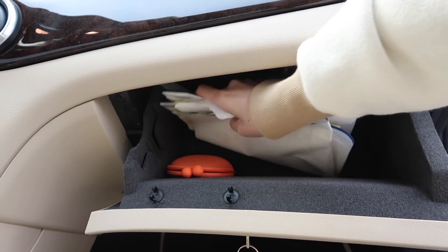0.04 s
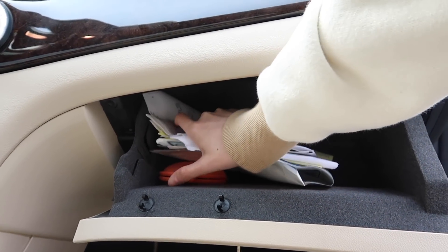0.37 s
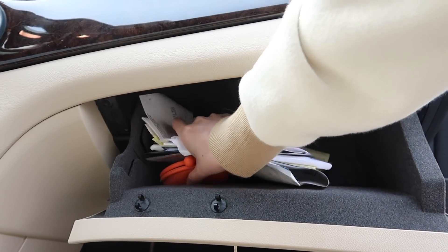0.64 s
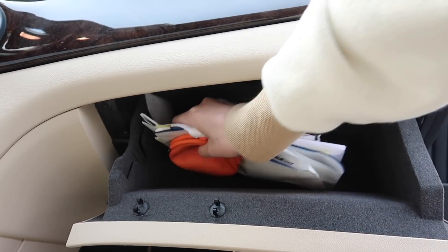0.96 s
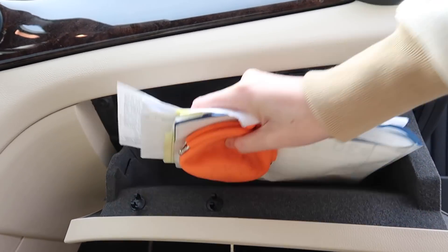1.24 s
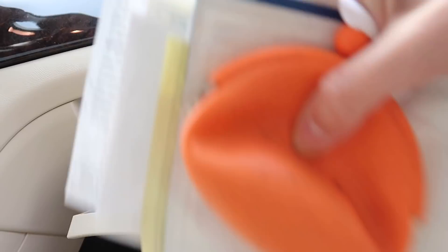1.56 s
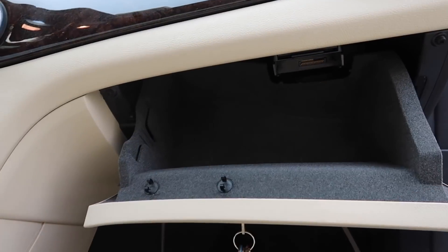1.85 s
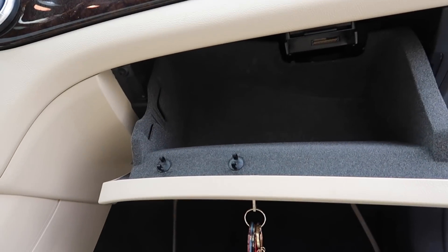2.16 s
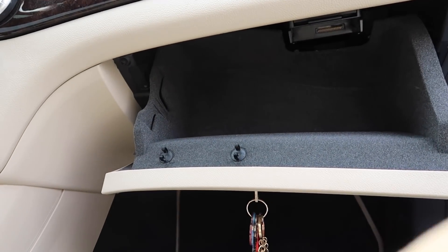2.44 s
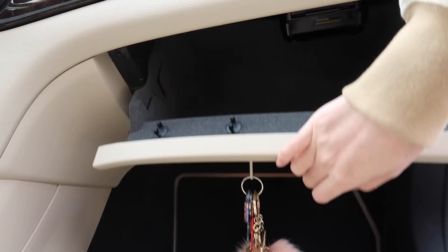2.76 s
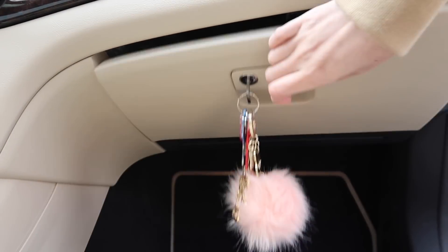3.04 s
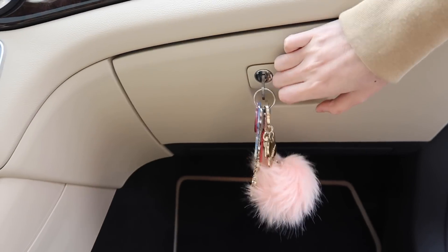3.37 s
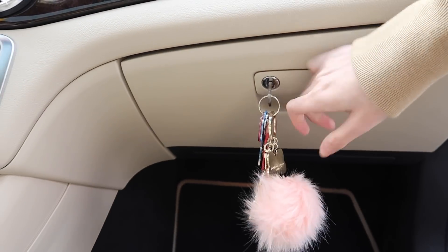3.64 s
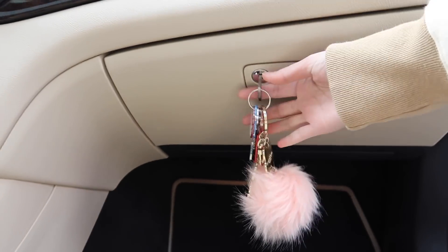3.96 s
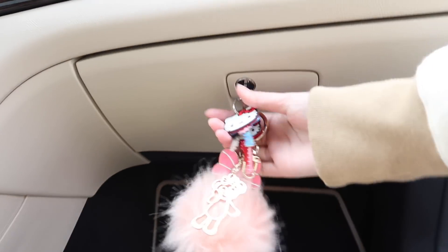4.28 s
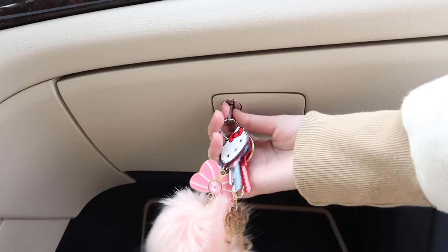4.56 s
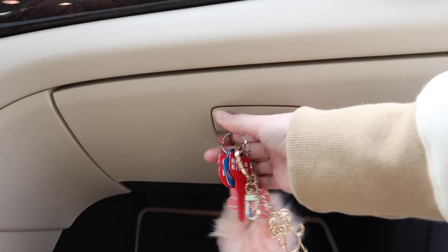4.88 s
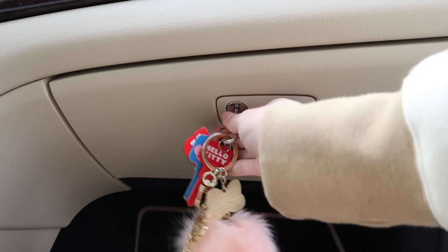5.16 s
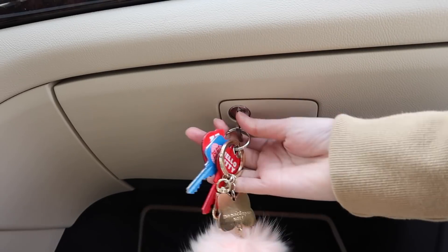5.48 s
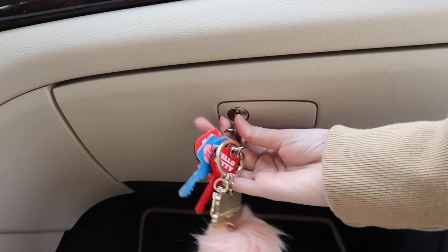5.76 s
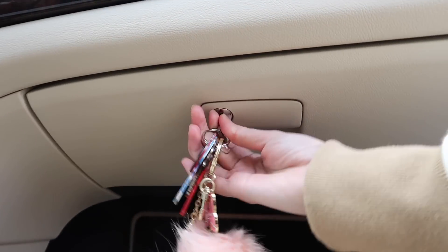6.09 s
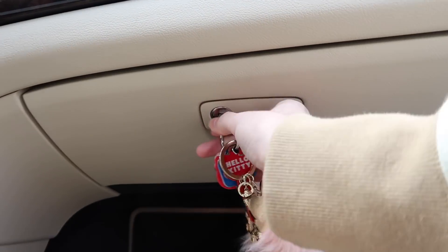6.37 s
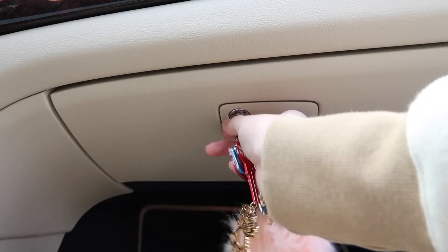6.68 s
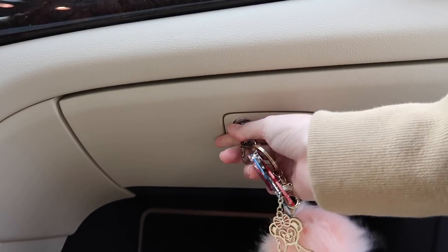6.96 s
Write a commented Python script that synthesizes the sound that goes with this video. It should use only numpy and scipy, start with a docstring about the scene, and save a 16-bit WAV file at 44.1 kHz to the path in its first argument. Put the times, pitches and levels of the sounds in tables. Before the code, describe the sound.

Inside a small padded car cabin, over a steady low hum, a bundle of papers is dragged from the glovebox, rubbing, crackling and snapping, with dull knocks on plastic. The lid shuts with a loud clack and thump. Keys and charms hanging from the lock clink, then jingle in the fingers while the key clicks and grates in its slot. A knitted sleeve brushes close to the microphone.

```python
"""Inside a small padded car cabin, over a low rumble, a hand drags papers out of the glovebox.
The sheets rub, crackle and snap as they buckle; knocks ring the plastic, and the lid shuts with a clack.
The keys and charms hanging from the lock swing and clink, then jingle in the fingers, which cut their
ringing short, while the key clicks and grates in its slot. A knitted sleeve brushes about close by."""
import sys
import numpy as np
from scipy import signal
from scipy.fft import rfft, irfft
from scipy.io import wavfile
from scipy.ndimage import uniform_filter1d

SR = 44100
rng = np.random.default_rng(int(sys.argv[2]) if len(sys.argv) > 2 else 0)


def store_pcm(level_fs):
    """Save levels as 16-bit WAV."""
    pcm = np.round(np.clip(level_fs, -1, 1) * 32767).astype(np.int16)
    wavfile.write(sys.argv[1], SR, np.atleast_2d(pcm).T)


N = 309876
TIME = np.arange(N) / SR
AGE = np.arange(SR // 6) / SR  # seconds since a hit

# A TONE table says how strong a sound is from bass to treble. A decay is the time to fade by 60 dB.
# Steady hum of the cabin: pitch_hz, level_db
DRONE_TONE = [(15, -13), (30, -13), (38, 1), (44, 5.5), (52, -5), (65, -20), (140, -16.5), (260, -23),
              (500, -40), (1000, -31.5), (2000, -40), (4000, -57), (9000, -61), (15000, -73)]
# Rumble of handling: pitch_hz, level_db
RUMBLE_TONE = [(40, -26), (65, 4.5), (140, 0.5), (210, -3.5), (280, -9.5), (450, -13.5), (800, -24.5),
               (1500, -59)]
# The rumble drops while the hand rests on the shut lid: time_s, level_db
RUMBLE_LEVELS = [(0, -35), (.8, -34), (2, -35), (3.2, -33), (3.48, -36.5), (3.68, -52.5), (4.15, -41.5),
                 (4.6, -39), (6.45, -34.5), (7.03, -34)]

# Pulls that slide paper on paper and felt: start_s, length_s, rise_s, rub_db, hiss_db
PAPER_PULLS = [(0, 0.19, 0.002, -41, -49), (0.16, 0.13, 0.027, -35.5, -41), (0.253, 0.09, 0.0069, -32, -39),
               (0.329, 0.082, 0.017, -36, -48.5), (0.438, 0.43, 0.078, -38.5, -49),
               (0.895, 0.25, .02, -29.5, -42.5), (0.994, 0.091, 0.042, -30, -36),
               (1.07, 0.11, .02, -39.5, -45), (1.188, 0.071, .02, -48, -51.5),
               (1.325, 0.15, 0.017, -40, -47), (1.407, 0.13, 0.014, -46, -40),
               (1.498, 0.016, 0.0081, -34, -33.5), (1.606, 0.28, 0.022, -48.5, -66),
               (1.808, 0.2, 0.036, -42, -57), (1.96, 0.14, 0.021, -41, -44.5),
               (2.061, 0.084, 0.071, -30.5, -41), (2.17, 0.053, 0.016, -35, -47),
               (2.26, 0.13, .02, -38.5, -51.5), (2.424, 0.046, .008, -39.5, -52.5),
               (2.452, 0.28, 0.18, -42, -56.5), (2.722, 0.38, .02, -73, -88)]
# Sheets rubbing: pitch_hz, level_db
RUB_TONE = [(200, -3), (380, 4.5), (520, 12.5), (700, 6.5), (1100, 7), (1280, 2), (1520, 7.5), (2100, 1.5),
            (3000, -1), (4200, -13), (6000, -17.5), (12000, -63)]
# Paper edges hissing: pitch_hz, level_db
HISS_TONE = [(2000, -19), (3500, 5), (5000, -0.5), (7000, -2), (10000, -7), (13000, -8.5), (15500, -28)]
# A sheet buckles: time_s, level_db, crispness_db, pitch_hz
PAPER_SNAPS = [(.0005, -20, 17.5, 1500), (.027, -35, 24, 3200), (.149, -36, -6, 2200),
               (0.163, -30, -3, 1970), (0.1763, -22.5, 11, 1900), (.249, -14, 14.5, 1130),
               (0.286, -30, 5, 1700), (0.323, -30, 5, 2790), (0.307, -21, 4, 1470), (0.456, -28, 2, 1110),
               (0.468, -25.5, 6, 1510), (0.503, -25.5, 9, 1700), (.549, -30.5, 14, 2670),
               (0.681, -32.5, 2, 2500), (0.719, -39, 10, 1700), (0.796, -23.5, 0.5, 2620),
               (0.82, -27, 1, 2980), (0.849, -27.5, -7, 1550), (0.8771, -21.5, 0, 2700),
               (0.8936, -19.5, 7, 2630), (0.9015, -18, 4, 3370), (.924, -25, -2, 2600),
               (.951, -25, 5, 2920), (0.969, -24.5, 2, 2000), (1.024, -22.5, 6, 2300),
               (1.042, -21.5, 11, 1190), (1.065, -28, 3, 2500), (1.076, -22.5, 9, 3060),
               (1.139, -31, 15, 3600), (1.163, -28.5, 3, 1890), (1.267, -34, -19, 1490),
               (1.339, -43, -9, 3000), (1.455, -37, 2, 1860), (1.465, -20.5, -1, 2530),
               (1.507, -15.5, 0, 1590), (1.514, -13, -1, 1480), (1.539, -19, 7, 1470),
               (1.545, -19, -12, 1290), (1.5511, -16, -5, 1480), (1.5774, -17.5, 6, 3470),
               (1.9796, -48, 0, 2400), (2.065, -26, -17, 1550), (2.1043, -30, 8, 1100),
               (2.114, -24, -4, 2300), (2.138, -22, 3.5, 1390), (2.147, -26, -3, 1700),
               (2.158, -30, -3, 1600), (2.2724, -27.5, -8, 1450), (2.3204, -27.5, -3, 1060),
               (2.3412, -13, 5, 1570), (2.372, -34, 3, 2400), (2.4351, -28, -5, 1930),
               (2.644, -33, -12, 2260), (2.674, -38, -7, 1500)]
# The snap of a sheet: pitch_hz, level_db
SNAP_TONE = [(120, -3), (300, 9), (700, 5), (1600, 6.5), (3200, 1), (5000, -6.5), (8000, -22),
             (13000, -31.5), (16000, -80)]
# The buckling patch favours its own pitch and a band higher up: pitch_ratio, level_db
FOLD_TONE = [(0.9, -7), (1, 0), (1.45, -7), (1.53, -8), (2.6, -3), (2.4, -6)]

# Dull knocks on the box and its lid: time_s, level_db, pitch_hz, relative_flex_db
BOX_KNOCKS = [(0.104, -31.5, 520, -14), (0.474, -28, 520, -6), (.547, -21, 499, -22), (1.156, -7, 478, -29),
              (1.266, -25.5, 465, -14), (1.2647, -26.5, 1040, -15), (1.54, -18, 467, 1.5),
              (2.137, -37, 396, 14.5), (2.19, -24, 327, -2), (2.71, -27.5, 473, 1),
              (3.233, -16.5, 543, -4.5), (3.491, -25.5, 530, -6.5), (4.314, -35, 575, -5.5),
              (4.545, -24, 390, -16), (4.572, -36, 514, -2), (4.594, -25, 543, -4),
              (4.616, -25.5, 463, -11), (4.63, -28.5, 562, 2), (4.983, -20, 421, -5),
              (5.093, -23.5, 465, -13), (5.153, -38, 520, -5), (5.648, -25, 492, -6),
              (5.916, -15, 502, -11), (6.322, -30, 476, -1), (6.528, -22.5, 388, -14),
              (6.553, -21.5, 453, 0), (6.686, -23.5, 413, 5), (6.721, -25, 428, -3)]
# Modes (the notes a thing rings with) of the plastic panel: pitch_ratio, level_db
PANEL_MODES = [(0.298, -19), (.72, -6), (0.88, -6), (1, 7.5), (1.1, 3), (1.42, -8), (2.2, -10)]
# The thud in each knock: pitch_hz, level_db
THUD_TONE = [(120, 2), (300, -17.5), (500, 4.5), (700, -10), (1150, -20), (1700, -16), (5000, -41.5)]

# Sheets squeal on the rim of the box: time_s, level_db
SQUEAK_LEVELS = [(1.6, -71), (1.64, -49.5), (1.72, -39), (1.76, -59), (1.82, -53)]
# The narrow band of that squeal: pitch_hz, level_db
SQUEAK_TONE = [(1000, -47.5), (1300, -2.5), (1400, -8.5), (1480, -7), (1800, -60)]
# The sleeve moves as the arm shuts the lid, lets go and works the key: time_s, level_db
SLEEVE_LEVELS = [(2.7, -37.5), (3.08, -40.5), (3.15, -29), (3.28, -34), (3.58, -53.5), (3.76, -50.5),
                 (3.85, -50), (4.2, -43), (4.4, -40.5), (4.62, -35), (4.8, -39), (5.2, -36), (5.8, -39.5),
                 (6.3, -37), (7.03, -39)]
# Knitted cloth brushing: pitch_hz, level_db
CLOTH_TONE = [(250, 14), (520, 6.5), (800, 0.5), (1500, -2.5), (2200, -8), (3500, -16.5), (7000, -26),
              (14000, -42), (15700, -62)]

# The lid meets its catch, rattles and latches: time_s, clack_db, thump_db, boom_db, rise_s, decay_s
LID_HITS = [(3.1577, -13, -18, -40, 0.0038, 0.055), (3.165, -20.5, -11.5, -26, 0.0026, 0.045),
            (3.175, -26.5, -12, -25, .003, 0.035), (3.233, -26.5, -19, -39, 0.0034, 0.08),
            (3.429, -23, -40, -40, 0.0012, 0.03), (3.4332, -2.5, -12, -11, 0.0006, 0.042),
            (5.913, -30, -21, -20, 0.00077, 0.067)]
# The hard clack of the lid: pitch_hz, level_db
CLACK_TONE = [(120, -13), (220, -11.5), (580, 0), (900, -7), (1150, -8), (1500, 2), (1900, -7.5),
              (2400, -8.5), (3100, -12.5), (3800, -17), (4900, -15), (8500, -24.5), (15500, -43)]
# Low notes of the lid: pitch_hz, level_db, decay_s
LID_LOW_MODES = [(160, -1, 0.11), (192, 0, 0.1), (262, -6, .06), (345, 2, 0.06), (480, -3, .045),
                 (590, -6, 0.06)]
# High notes of the lid: pitch_hz, level_db, decay_s
LID_HIGH_MODES = [(660, -4, .028), (917, -3, .025), (1128, 3.5, .03), (1490, 1.5, .026), (1735, -2, .024),
                  (3084, 3, .024), (3661, -1, .022), (4450, -9, .02)]

# Trinkets (keys, charm, tag) collide: time_s, contact_db, ring_db, struck_name
TRINKET_CLINKS = [(3.1605, -20.5, -56, "keys"), (3.2, -53, -40, "keys"), (3.2348, -44, -33.5, "charm"),
                  (3.284, -57, -40.5, "keys"), (3.386, -70, -58, "charm"), (3.492, -41, -43, "keys"),
                  (3.5198, -46, -45, "charm"), (3.564, -65, -56, "tag"), (3.902, -59, -75, "keys"),
                  (3.957, -55, -73, "keys"), (4.041, -52, -65, "keys"), (4.0733, -46, -56.5, "keys"),
                  (4.144, -53, -75, "keys"), (4.251, -38, -35.5, "charm"), (4.352, -47, -55, "keys"),
                  (4.4458, -49, -45.5, "charm"), (4.493, -41, -47, "tag"), (4.527, -44, -45, "keys"),
                  (4.553, -35, -35.5, "charm"), (4.577, -34, -39, "keys"), (4.637, -36, -49, "keys"),
                  (4.658, -40, -55, "keys"), (4.684, -41.5, -45.5, "tag"), (4.7377, -40.5, -51, "tag"),
                  (4.796, -45, -60, "keys"), (4.814, -45.5, -62, "keys"), (4.865, -52, -58, "tag"),
                  (4.9594, -41, -55, "tag"), (4.979, -43, -63, "charm"), (5.0012, -55, -34.5, "tag"),
                  (5.043, -42, -48, "charm"), (5.116, -43, -43, "keys"), (5.138, -48, -49, "charm"),
                  (5.152, -35, -34, "charm"), (5.196, -35, -41, "tag"), (5.215, -54, -44, "keys"),
                  (5.237, -40, -50, "charm"), (5.2895, -42, -46.5, "keys"), (5.313, -35.5, -27, "tag"),
                  (5.326, -37, -31, "tag"), (5.434, -51, -61, "charm"), (5.463, -41, -50, "charm"),
                  (5.487, -40, -57, "charm"), (5.5197, -39, -44, "tag"), (5.53, -36, -42, "charm"),
                  (5.544, -40, -59, "tag"), (5.6197, -40, -51, "charm"), (5.68, -38.5, -50, "tag"),
                  (5.774, -59, -59, "charm"), (5.833, -52, -58, "tag"), (5.886, -54, -53, "tag"),
                  (5.914, -45, -48, "tag"), (5.931, -33.5, -37, "charm"), (5.941, -47, -43, "keys"),
                  (5.97, -40, -42, "keys"), (6.0327, -34, -34.5, "charm"), (6.262, -51, -56, "charm"),
                  (6.301, -31.5, -41.5, "charm"), (6.331, -36, -55, "keys"), (6.356, -36, -61, "keys"),
                  (6.476, -37, -41, "tag"), (6.5053, -26, -37, "keys"), (6.617, -36.5, -41, "tag"),
                  (6.6547, -29, -46, "charm"), (6.6747, -26.5, -39, "tag"), (6.721, -39, -52, "keys"),
                  (6.735, -30.5, -38, "tag"), (6.787, -41, -49, "tag"), (6.808, -41, -59, "charm"),
                  (6.906, -47.5, -53, "tag")]
# Notes of the keys: pitch_hz, level_db, decay_s
KEY_MODES = [(3250, -10, .05), (7355, -2, .16), (7410, -1, .14), (7630, -5, .1), (7810, -7, .07),
             (8597, -7, .06)]
# Notes of the wire charm: pitch_hz, level_db, decay_s
CHARM_MODES = [(11550, -7, .03), (11965, -2, .035), (12260, -3, .035), (12420, 0, .055), (12650, -5, .03)]
# Notes of the flat tag: pitch_hz, level_db, decay_s
TAG_MODES = [(10025, -4, .12), (10114, 0, .16), (10298, -11, .05), (13695, -13, .09)]
# Small chain links ticking and scraping: pitch_hz, level_db
LINK_TONE = [(900, 5), (1900, 10), (2400, 2.5), (3200, 7), (4200, 3), (5200, 5), (6000, 1.5), (7500, 4.5),
             (9500, 1), (11000, -10), (12300, 1.5), (13700, -14.5), (14600, -34), (16000, -51.5)]
# The bunch is shaken and its chain rattles: start_s, length_s, level_db
CHAIN_SHAKES = [(3.167, 0.12, -45), (3.428, 0.071, -46.5), (4.027, 0.055, -67), (4.206, 0.057, -49.5),
                (4.327, 0.14, -79), (4.429, 0.13, -54), (4.515, 0.078, -42.5), (4.657, 0.14, -65),
                (4.94, 0.15, -63), (5.186, 0.021, -49), (5.313, 0.051, -53), (5.45, 0.033, -50.5),
                (5.498, 0.03, -56), (5.61, 0.58, -63.5), (5.908, 0.073, -52), (6.033, 0.3, -67),
                (6.286, 0.069, -46), (6.455, 0.18, -52), (6.61, 0.16, -47.5), (6.768, 0.032, -56)]
# The chain drums on the lid through the key: pitch_hz, level_db
DRUM_TONE = [(150, -8.5), (340, -22.5), (520, 14), (640, 0.5), (850, -16.5), (2000, -13.5), (5000, -39.5)]

# Fingers slide over plastic: start_s, length_s, rise_s, level_db
FINGER_SLIDES = [(3.709, 0.054, .05, -54.5), (4.296, 0.19, 0.02, -52.5)]
# The whisper of skin: pitch_hz, level_db
SKIN_TONE = [(1000, -11), (2500, 1.5), (3800, -1), (6000, -10), (10000, -17), (13000, -20), (15500, -36)]
# The key and its ring click in the lock: time_s, level_db, pitch_hz, decay_s, relative_grit_db
LOCK_CLICKS = [(3.9008, -30.5, 3010, 0.011, -17), (4.225, -31, 2970, 0.086, -11),
               (4.9813, -23, 1690, 0.011, -6), (5, -37.5, 3250, .04, -14), (5.0885, -40, 6300, .005, 0),
               (5.0925, -31, 2940, 0.007, -1), (5.197, -35.5, 3280, .03, -14),
               (5.827, -25, 4290, 0.012, -20), (5.913, -29, 2900, 0.011, -10),
               (6.5067, -22, 3030, 0.019, -5), (6.543, -28, 3150, .007, 3), (6.552, -34, 3050, .01, 0),
               (6.657, -33, 2900, .006, 11), (6.663, -36, 3120, .008, 3), (6.6743, -29.5, 3440, 0.0088, 0)]
# Grit from the pins of the lock: pitch_hz, level_db
PIN_TONE = [(300, -19), (1000, 7), (1800, 5), (2400, 2), (3100, 3.5), (4500, -6.5), (8000, -7),
            (12000, -14), (14000, -16), (15500, -41)]
# The key is twisted: start_s, length_s, level_db
KEY_TWISTS = [(6.317, 0.046, -44.5), (6.525, 0.017, -34), (6.607, 0.072, -43), (6.713, 0.036, -47)]
# The key grating in its slot: pitch_hz, level_db
SLOT_TONE = [(400, -22), (1000, -6), (2000, -6), (2500, 5), (3200, 9), (4500, -4), (8000, -7), (15000, -33)]

# How far left and right differ, against what they share: pitch_hz, side_db
STEREO_WIDTH = [(30, -76), (110, -54), (220, -20), (400, -18), (700, -18), (1300, -13), (2400, -12.5),
                (4400, -6.5), (8000, -2.5), (13000, 0)]
# How long the cabin echoes: pitch_hz, decay_s
ECHO_DECAYS = [(100, 0.055), (500, 0.15), (3000, 0.084), (14000, 0.03)]
# The echo is mostly treble: pitch_hz, level_db
ECHO_TONE = [(200, -59), (700, -49.5), (2500, -8.5), (9000, 4)]

GRASP_S = 4.15  # from here on the fingers hold the bunch


def amp(db):
    """Turns decibels into a gain."""
    return 10 ** (np.asarray(db) / 20)


def unit(x):
    """Scales a sound to an average (rms) level of 1."""
    return x / np.sqrt(np.mean(x ** 2) + 1e-20)


def crest(x, size=88):
    """Scales a sound so its loudest stretch of `size` samples has an rms level of 1."""
    return x / np.sqrt(uniform_filter1d(x ** 2, size).max() + 1e-20)


def look_up(table, hz):
    """Reads a table at any pitch, blending between its rows."""
    pitches, values = np.transpose(table)
    return np.interp(np.log(hz + 1), np.log(pitches + 1), values)


def follow(levels):
    """Turns times and levels into a gain curve, silent before and after."""
    times, db = np.transpose(levels)
    return amp(np.interp(TIME, times, db, left=-120, right=-120))


def add(mix, time_s, sound):
    """Lays a sound into the mix at the given time."""
    part = mix[max(round(time_s * SR), 0):][:len(sound)]
    part += sound[:len(part)]


def colour(x, tone, size=4096):
    """Filters by a tone table; nothing sounds early, so hits stay sharp."""
    hz = abs(np.fft.fftfreq(size, 1 / SR))
    log_gain = np.log(amp(look_up(tone, hz)))
    taps = np.fft.ifft(np.exp(np.conj(signal.hilbert(log_gain)))).real
    return signal.oaconvolve(x, taps[:size // 2])[:len(x)]


def wander(turns_per_s):
    """A curve that drifts at random around zero."""
    points = rng.standard_normal(int(N / SR * 400))
    return np.interp(TIME * turns_per_s, np.arange(len(points)), points)


def gesture(start_s, length_s, rise_s, fall_s):
    """One move of the hand: it rises, holds and dies away."""
    age = TIME - start_s
    return np.clip(age / rise_s, 0, 1) * np.exp(-np.clip((age - length_s) / fall_s, 0, 20))


def fade(decay_s):
    """The dying away after a hit."""
    return np.exp(-np.log(1000) * AGE / max(decay_s, .002))


def burst(decay_s, rise_s=0.00015):
    """The dense rattle of one contact, made of fading noise."""
    return rng.standard_normal(len(AGE)) * fade(decay_s) * (1 - np.exp(-AGE / rise_s))


def ring(modes, scatter_db):
    """Fading notes; each hit lands somewhere else and favours different ones."""
    draws = rng.standard_normal((len(modes), 2))
    return sum(amp(db + scatter_db * luck) * np.sign(side) * np.sin(2 * np.pi * hz * AGE) * fade(decay_s)
               for (hz, db, decay_s), (luck, side) in zip(modes, draws))


def stray_modes(low_hz, high_hz, decay_s, count):
    """Random notes within a band, like a different bit of metal each time."""
    return [(low_hz + (high_hz - low_hz) * place, 0, decay_s * (.5 + length))
            for place, length in rng.random((count, 2))]


def grains(per_s, spread_db):
    """Surfaces stick and slip in tiny clicks, mostly small, a few large."""
    sizes = amp(spread_db * np.minimum(rng.exponential(1, N), 4))
    return unit(sizes * rng.choice([-1, 1], N) * (rng.random(N) < per_s / SR))


def grit(decay_s, per_s):
    """One hard contact and a dying spray of tiny slips."""
    slips = burst(decay_s) * (rng.random(len(AGE)) < per_s / SR)
    slips[0] = 1.3
    return slips


def bounce(hit, gap_s, loss_db, count=2):
    """Follows a hit with quick, uneven rebounds."""
    taps = np.zeros(len(AGE))
    taps[0] = 1
    delays = np.cumsum(gap_s * (.5 + rng.random(count))) * SR
    taps[np.clip(delays.astype(int), 1, len(taps) - 1)] = amp(-loss_db * np.arange(1, count + 1))
    return signal.fftconvolve(hit, taps)[:len(AGE)]


def crinkle(x, depth_db):
    """Shifts the tone as a bending sheet does, in patches about 500 Hz wide and 40 ms long."""
    spectrum = signal.stft(x, nperseg=512)[2]
    patches = uniform_filter1d(rng.standard_normal(spectrum.shape), size=6, axis=0)
    patches = unit(uniform_filter1d(patches, size=7, axis=1))
    return unit(signal.istft(spectrum * amp(depth_db * patches), nperseg=512)[1][:N])


def cabin_drone():
    """The cabin hums with steady, deep noise."""
    return amp(-37) * unit(colour(rng.standard_normal(N), DRONE_TONE, size=16384))


def handling_rumble():
    """Handling makes a low rumble whose level wavers."""
    rumble = colour(rng.standard_normal(N), RUMBLE_TONE)
    return follow(RUMBLE_LEVELS) * unit(rumble * amp(2.54 * wander(25)))


def crease(hz, crisp_db):
    """One fold gives way in a few slips and the sheet flutters; a crisper fold has less body."""
    slips = bounce(grit(.011, per_s=8000), gap_s=.0013, loss_db=3)
    snap = burst(decay_s=.065) + amp(15) * slips
    tilt = [(700, -0.42 * crisp_db), (2200, 0), (7000, crisp_db)]
    fold = [(hz * ratio, db) for ratio, db in FOLD_TONE]
    for tone in (SNAP_TONE, tilt, fold):
        snap = colour(snap, tone, size=1024)
    return crest(snap)


def papers(creases_per_s=110, folds=8):
    """Sheets slide in clumps of tiny slips, crease at random and snap where they buckle."""
    rub_gain, hiss_gain = np.zeros((2, N))
    for start_s, length_s, rise_s, rub_db, hiss_db in PAPER_PULLS:
        pull = gesture(start_s, length_s, rise_s, fall_s=.04)
        rub_gain = np.maximum(rub_gain, amp(rub_db) * pull)
        hiss_gain = np.maximum(hiss_gain, amp(hiss_db) * pull)
    clumps = unit(amp(2.3 * wander(110)))
    rub = crinkle(colour(grains(4500, 2.7) * clumps, RUB_TONE), depth_db=2.8)
    hiss = crinkle(colour(grains(5000, 1.7) * clumps, HISS_TONE), depth_db=2)
    creases = np.zeros(N)
    for hz in np.geomspace(900, 4200, folds):
        moments = grains(creases_per_s / folds, 1.5)
        creases += signal.oaconvolve(moments, crease(hz, crisp_db=rng.uniform(-6, 6)))[:N]
    out = rub_gain * rub + hiss_gain * (hiss + amp(0.5) * unit(creases))
    for time_s, db, crisp_db, hz in PAPER_SNAPS:
        add(out, time_s, amp(db) * crease(hz, crisp_db))
    return out


def panel(hz, decay_s=.052):
    """The notes of the plastic start together, then drift apart, so the knock dies quickly."""
    notes = sum(amp(db) * np.sin(2 * np.pi * hz * ratio * AGE) * fade(decay_s / np.sqrt(ratio))
                for ratio, db in PANEL_MODES)
    return crest(notes * (1 - np.exp(-AGE / .0025)))


def box_knocks(flex_hz=131, flex_decay_s=0.055):
    """Knocks ring the plastic panel, and a heavy push flexes the whole lid."""
    out = np.zeros(N)
    for time_s, db, hz, flex_db in BOX_KNOCKS:
        thud = crest(colour(burst(0.088), THUD_TONE))
        knock = crest(panel(hz) + amp(-8) * thud)
        flex = crest(ring([(flex_hz, 0, flex_decay_s)], scatter_db=0))
        add(out, time_s, amp(db) * (knock + amp(flex_db) * flex))
    return out


def paper_squeak():
    """The bundle squeals faintly on the rim as it leaves the box."""
    return follow(SQUEAK_LEVELS) * unit(colour(grains(360, 5.3), SQUEAK_TONE))


def sleeve():
    """Knitted cloth catches and slips thousands of times a second, making a soft brushing."""
    return follow(SLEEVE_LEVELS) * unit(colour(grains(6000, 2.13), CLOTH_TONE))


def lid(boom_hz=94, boom_decay_s=0.099):
    """The lid hits its catch with a clack and a thump, and the air shut in the box booms."""
    out = np.zeros(N)
    for time_s, clack_db, thump_db, boom_db, rise_s, decay_s in LID_HITS:
        rattle = crest(colour(burst(decay_s, rise_s), CLACK_TONE))
        clack = crest(rattle + crest(ring(LID_HIGH_MODES, scatter_db=0.46)))
        boom = crest(ring([(boom_hz, 0, boom_decay_s)], scatter_db=0))
        thump = crest(ring(LID_LOW_MODES, scatter_db=0.35))
        add(out, time_s, amp(clack_db) * clack + amp(thump_db) * thump + amp(boom_db) * boom)
    return out


def trinket_touch(modes, scatter_db, band_hz, decay_s, count, stray_db):
    """A trinket rings its own notes among short stray ones from the ring and links it hangs on."""
    own = crest(ring(modes, scatter_db))
    strays = crest(ring(stray_modes(*band_hz, decay_s, count), scatter_db=3))
    return (own + amp(stray_db) * strays) * (1 - np.exp(-AGE / .0003))


def trinket_touches(count=20):
    """Many ways for each trinket to ring, depending on where it is touched."""
    keys, charm, tag = [], [], []
    for _ in range(count):
        keys.append(trinket_touch(KEY_MODES, 4, (6400, 10000), decay_s=.05, count=7, stray_db=4.5))
        charm.append(trinket_touch(CHARM_MODES, 4, (10600, 13700), decay_s=.05, count=4, stray_db=-3))
        tag.append(trinket_touch(TAG_MODES, 3, (7000, 13900), decay_s=.035, count=8, stray_db=-3))
    return {"keys": keys, "charm": charm, "tag": tag}


def metal_tick():
    """Metal meets metal: a tick that rebounds, coloured by the small link it lands on."""
    tick = crest(colour(burst(0.09) + amp(13.5) * burst(0.0061), LINK_TONE, size=1024))
    link = crest(ring(stray_modes(4500, 13500, .016, count=6), scatter_db=3))
    return crest(bounce(tick + amp(-9.5) * link, gap_s=.004, loss_db=3.5))


def chatter(sounds, mean_gap_s=.004, loss_db=3.5, hits=4):
    """A trinket strikes and bounces a few times, on a different spot each time."""
    out, time_s = np.zeros(len(AGE)), 0
    for hit, (pick, gap, size) in enumerate(rng.random((hits, 3))):
        add(out, time_s, amp(-loss_db * hit) * (.5 + size) * sounds[int(pick * len(sounds))])
        time_s += 2 * mean_gap_s * gap
    return out


def key_bunch(touches):
    """Each collision ticks and sets a trinket and its neighbours ringing; fingers cut the ring short."""
    out = np.zeros(N)
    for time_s, contact_db, ring_db, struck in TRINKET_CLINKS:
        held = time_s > GRASP_S
        damping = fade(.24) if held else 1
        add(out, time_s, amp(contact_db) * metal_tick())
        for name, sounds in touches.items():
            neighbour_db = (-14.5 if held else -0.5) + rng.uniform(-1.2, 0.5)
            if name == "tag":
                neighbour_db -= 8  # the heavy tag answers less to a passing touch
            db = ring_db if name == struck else ring_db + neighbour_db
            add(out, time_s, amp(db) * crest(chatter(sounds) * damping, size=1024))
    return out


def chain(touches, link_count=16, hits_per_s=260, brushes_per_s=32):
    """Shaken links clink and scrape, brush each trinket and drum on the lid through the key."""
    shake = amp(-73) * (TIME > GRASP_S)  # the links never quite rest in the fingers
    for start_s, length_s, db in CHAIN_SHAKES:
        shake = np.maximum(shake, amp(db) * gesture(start_s, length_s, rise_s=0.037, fall_s=0.032))
    links = [ring(stray_modes(5800, 14000, .03, count=6) + stray_modes(2800, 5800, .012, count=1), 4)
             for _ in range(link_count)]
    clinks = unit(sum(signal.oaconvolve(grains(hits_per_s / link_count, 2.5), link)[:N] for link in links))
    brushes = np.zeros(N)
    for sounds in touches.values():
        for when, pick, size in rng.random((int(brushes_per_s * N / SR), 3)):
            add(brushes, when * N / SR, size * sounds[int(pick * len(sounds))])
    slips = signal.oaconvolve(abs(grains(600, 4.5)), fade(.012))[:N] * rng.standard_normal(N)
    scrape = crinkle(colour(slips, LINK_TONE), depth_db=3.5)
    drum = unit(colour(grains(300, 4), DRUM_TONE))
    return shake * (amp(1.5) * scrape + amp(-4) * clinks + amp(-7.5) * unit(brushes) + amp(9.5) * drum)


def fingers():
    """Skin slides over the lid and the key covers with a dry whisper."""
    slide = sum(amp(db) * gesture(start_s, length_s, rise_s, fall_s=0.01)
                for start_s, length_s, rise_s, db in FINGER_SLIDES)
    return slide * unit(colour(grains(4000, 1.8), SKIN_TONE))


def lock_clicks():
    """Metal snaps against metal: a tick, a ring damped by the fingers, and grit from the pins."""
    out = np.zeros(N)
    for time_s, db, hz, decay_s, grit_db in LOCK_CLICKS:
        modes = [(hz, 0, decay_s), (hz * 1.13, -9, decay_s * 0.48), (hz * 3.2, -6, .003)]
        click = ring(modes, scatter_db=0.41)
        click[0] += amp(-1)  # the instant tick
        pins = crest(colour(grit(.04, per_s=4000), PIN_TONE, size=1024))
        add(out, time_s, amp(db) * crest(crest(click) + amp(grit_db) * pins))
    return out


def key_grate():
    """The twisted key sticks and slips in its slot."""
    twist = sum(amp(db) * gesture(start_s, length_s, rise_s=0.025, fall_s=0.01)
                for start_s, length_s, db in KEY_TWISTS)
    return twist * unit(colour(grains(800, 3), SLOT_TONE))


def stereo(x, spread_s=0.013, paths=3):
    """Left and right share the bass but differ in the treble, by paths that shift as the hand moves."""
    wide = rfft(x) * amp(look_up(STEREO_WIDTH, np.fft.rfftfreq(N, 1 / SR)))
    shares = np.array([wander(18) for _ in range(paths)])
    shares /= np.linalg.norm(shares, axis=0)
    # for each path: which side is ahead at each pitch, and how far
    leads = [unit(np.cos(np.angle(rfft(burst(spread_s), N)))) for _ in range(paths)]
    side = sum(share * irfft(1j * wide * lead, N) for share, lead in zip(shares, leads))
    return np.array([x + side, x - side])


def cabin_echo(x, delay_s=.004):
    """Short, dense reflections from trim and glass, different on each side."""
    reflections = rng.standard_normal((2, len(AGE))) * (AGE > delay_s)
    hz, age, spectrum = signal.stft(reflections, SR, nperseg=256)
    decay = amp(-60 * age / look_up(ECHO_DECAYS, hz)[:, None])
    tail = signal.istft(spectrum * decay, SR, nperseg=256)[1]
    bright = colour(x, ECHO_TONE)
    return signal.fftconvolve(bright[None], tail / np.linalg.norm(tail[0]), axes=1)[:, :N]


def scene():
    """Everything the hand touches, with its echo, over the drone, rumble and sleeve."""
    touches = trinket_touches()
    handled = papers() + paper_squeak() + box_knocks() + lid()
    handled += lock_clicks() + key_bunch(touches) + chain(touches) + fingers() + key_grate()
    background = cabin_drone() + handling_rumble() + sleeve()
    return stereo(handled + background) + amp(-12.5) * cabin_echo(handled)


def record(dry):
    """Flattens any peak that overloads, as the latch can, then cuts the highest treble."""
    clipped = np.clip(dry, -1, 1)
    low_pass = signal.firwin(255, cutoff=15600, window=("kaiser", 9), fs=SR)
    return signal.oaconvolve(clipped, low_pass[None], "same")


dry = scene()
out = record(dry)
store_pcm(out)
```